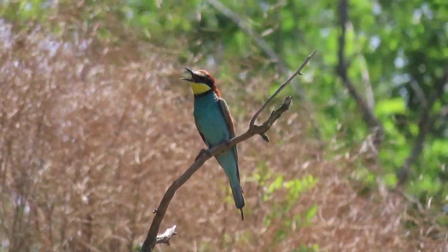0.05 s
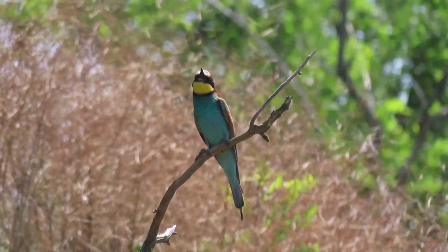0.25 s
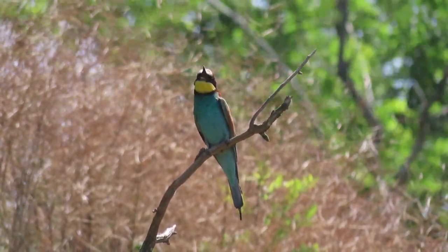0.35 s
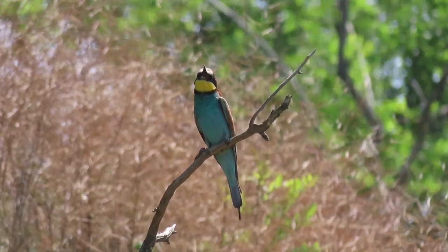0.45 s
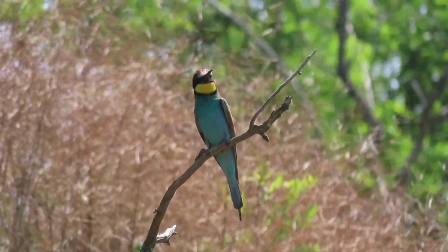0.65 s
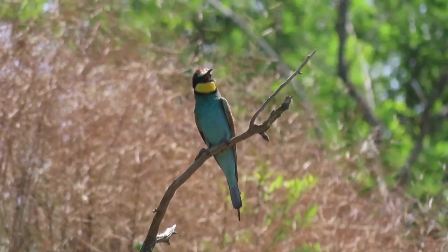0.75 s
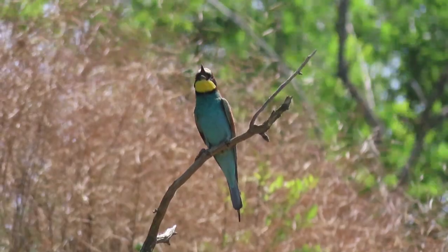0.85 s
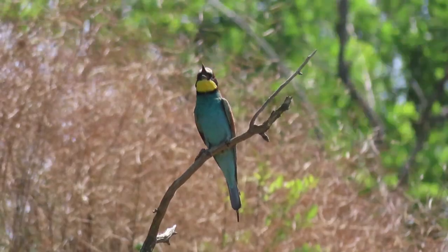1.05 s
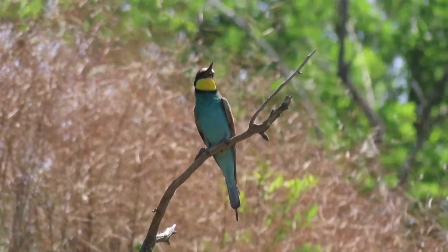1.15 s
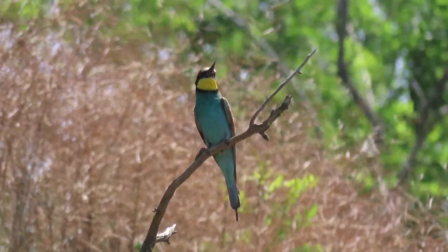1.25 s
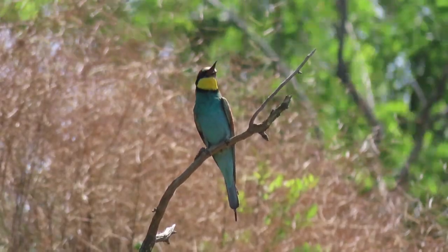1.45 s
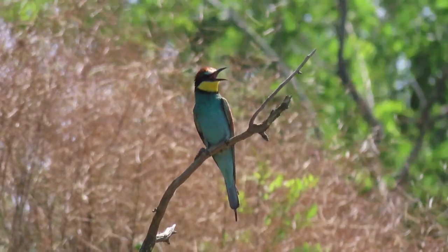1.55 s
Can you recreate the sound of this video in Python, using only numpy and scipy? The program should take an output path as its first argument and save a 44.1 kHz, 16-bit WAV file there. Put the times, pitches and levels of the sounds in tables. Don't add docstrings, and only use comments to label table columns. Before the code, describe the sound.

Bird calls, brief fluty chirps flicking up in pitch, outdoors with wind thumping the microphone

```python
import sys
import numpy as np
from scipy import signal
from scipy.fft import rfft, irfft
from scipy.io import wavfile
from scipy.ndimage import uniform_filter1d, map_coordinates

SR = 44100
rng = np.random.default_rng(int(sys.argv[2]) if len(sys.argv) > 2 else 0)


def makeup_ratio(level_db):
    decades = np.asarray(level_db, float) / 20
    return 10 ** decades


def master_out(mix):
    frames = np.transpose(np.atleast_2d(mix))
    ceiling = np.clip(frames, -1, 1)
    pcm = np.round(ceiling * 32767).astype(np.int16)
    wavfile.write(sys.argv[1], SR, pcm)


N = 70560

# (time [s], level [dB])
GUSTS = [(0.0, -39), (0.276, -36.5), (0.32, -25), (0.37, -23), (0.42, -26.5), (0.552, -22.5), (0.588, -34),
         (0.654, -27.5), (0.69, -40), (0.872, -35.5), (0.958, -25), (0.998, -27), (1.032, -29),
         (1.068, -32), (1.115, -25), (1.184, -17.5), (1.296, -30), (1.6, -41)]
# (frequency [Hz], level [dB per Hz])
RUMBLE = [(12, -32), (20, -15), (43, 6), (60, -3), (118, -4.5), (168, -11.5), (325, -32), (443, -31),
          (500, -38), (650, -76), (1100, -120)]
# (frequency [Hz], level [dB per Hz])
RUMBLE_SIDE = [(12, -33), (20, -64), (119, -4), (251, -10), (318, -6), (560, -29.5), (700, -33), (910, -44),
               (1540, -120)]
# (frequency [Hz], level [dB per Hz])
SWIRL = [(60, -65), (115, -5), (160, 1), (210, -5), (320, -20), (600, -61), (1200, -120)]
# (time [s], peak level [dB], frequency [Hz])
EDDIES = [(0.314, -24.5, 41), (0.332, -31, 80), (.345, -20, 59.3), (0.362, -19.5, 78), (0.372, -22, 88),
          (0.38, -17, 67.6), (.398, -14, 53.4), (0.419, -29, 60.6), (0.434, -23.5, 45), (0.456, -28.5, 45),
          (.481, -28.5, 39.8), (0.503, -27.5, 49.4), (0.538, -22, 36), (0.557, -22, 58), (0.602, -30.5, 30),
          (.632, -32.5, 84), (0.646, -28, 55), (0.661, -34, 70), (0.926, -39, 49.5), (.952, -22, 63),
          (0.98, -30, 79), (1.03, -24, 56.3), (1.051, -34, 75.6), (1.097, -37, 50.7), (1.117, -24.5, 95),
          (1.133, -36, 65), (1.142, -33, 75), (1.163, -18, 48.7), (1.184, -14.5, 56), (1.199, -15, 73),
          (1.217, -22, 55), (1.233, -21, 55.6), (1.254, -25, 51.6), (1.269, -40, 70), (1.307, -29.5, 59.7)]
# (time [s], level [dB])
TRAFFIC = [
    (0.0, -39.5),
    (0.676, -35.5),
    (0.894, -40.5),
    (1.332, -39),
    (1.6, -42.5),
]
# (frequency [Hz], level [dB per Hz])
ROAD = [(88, -68), (150, -0.5), (244, -6.5), (307, -4.5), (397, -7), (500, -6.5), (889, -3), (1480, -13),
        (3200, -28), (4160, -49), (7040, -120)]
# (frequency [Hz], level [dB per Hz])
ROAD_SIDE = [(88, -76), (150, -46), (285, -18), (323, -7), (613, -18), (803, -10), (3200, -26), (4160, -67),
             (7040, -120)]
# (frequency [Hz], width [Hz], level [dB])
TYRE_TONES = [(530, 42, 5.5), (699, 46, 4.5), (999, 52, 4), (1330, 81, 1.5)]
# (frequency [Hz], level [dB per Hz])
HISS = [(1470, -7.5), (2500, -1.5), (4240, -2.5), (6320, -8.5), (7770, -11.5), (8590, -14), (13200, -25),
        (15600, -25)]
# (frequency [Hz], level [dB per Hz])
HISS_SIDE = [(1470, -44), (2500, -21), (2800, -44), (3120, -28), (3720, 4), (4310, -4.5), (7480, -2),
             (15600, -18.5)]
# (time [s], pitch [Hz], level [dB])
LEFT_BIRD = [
    [(.113, 1450, -73), (.119, 1560, -39), (.13, 1802, -46), (.14, 1864, -40.5), (.157, 1903, -37),
     (.162, 2210, -50), (.172, 1867, -35), (.18, 1720, -51), (.19, 1540, -48)],
]
FIRST_CALL = [
    [(.198, 1530, -51), (.207, 1689, -45), (.233, 1828, -39), (.241, 1934, -32), (.245, 1990, -26.5),
     (.249, 2600, -36.5), (.253, 2300, -35), (.257, 1930, -31), (.262, 1800, -60)],
    [(.263, 1796, -48), (.271, 1880, -36.5), (.278, 1994, -35), (.284, 2370, -29.5), (.294, 2016, -31.5),
     (.298, 2284, -31), (.304, 1895, -42), (.312, 1680, -41), (.317, 1760, -45), (.323, 1690, -40),
     (.331, 1760, -45)],
]
SECOND_CALL = [
    [(.542, 1720, -48), (.55, 1755, -42.5), (.575, 1796, -36), (.585, 1937, -35.5), (.591, 2470, -35),
     (.594, 2450, -34.5), (.599, 1904, -34.5), (.604, 1850, -35)],
    [(.604, 1830, -37.5), (.618, 1843, -35), (.624, 1975, -33), (.629, 2344, -40.5), (.633, 2186, -37),
     (.638, 1880, -36), (.643, 2060, -33), (.647, 1910, -42), (.654, 1800, -38), (.662, 1650, -48)],
]
THIRD_CALL = [
    [(.853, 1803, -45), (.863, 1866, -43), (.869, 1970, -40.5), (.89, 2025, -41), (.897, 2270, -36),
     (.9, 2280, -34.5), (.905, 1970, -34), (.912, 1860, -50), (.92, 1810, -65)],
]
# (time [s], pitch [Hz], level [dB])
FAR_CALLS = [
    [(.364, 1812, -57), (.369, 1922, -44), (.38, 2273, -49), (.386, 1970, -65), (.396, 2055, -42),
     (.404, 2086, -62), (.418, 1984, -49), (.427, 1950, -52), (.436, 2184, -61), (.45, 1630, -47)],
    [(.445, 1330, -62), (.46, 1369, -50), (.49, 1338, -50), (.52, 1330, -48), (.545, 1330, -64)],
    [(.672, 1620, -56), (.68, 1733, -48), (.688, 2000, -48), (.697, 2100, -45)],
    [(1.086, 1756, -63), (1.097, 1946, -53), (1.104, 1970, -71), (1.117, 2020, -42), (1.123, 2320, -66),
     (1.129, 2140, -38.5), (1.134, 2040, -56.5), (1.139, 1940, -41), (1.146, 1810, -64)],
    [(1.156, 1944, -62), (1.163, 2015, -52), (1.169, 2130, -58), (1.176, 2250, -46), (1.183, 2100, -60)],
]
PAN_DB = [8, -2, -1, -2, -2]
# (time [s], peak level [dB], length [s], pitch [Hz])
WHISTLES = [
    (.243, -39, 0.042, 3060),
    (0.388, -41.5, 0.041, 3020),
    (0.539, -43.5, 0.045, 3030),
    (0.701, -44, 0.054, 2903),
    (0.878, -40.5, 0.043, 2900),
]


def unit(x):
    return x / np.sqrt(np.mean(x ** 2) + 1e-20)


def wobble(rate):
    knots = rng.standard_normal(int(N * rate / SR) + 4)
    return map_coordinates(knots, [np.arange(N) * rate / SR])


def rush(spectrum, patchy_db, bumps=()):
    z = signal.stft(rng.standard_normal(N + 2048), nperseg=512)[2]
    patches = uniform_filter1d(rng.standard_normal(z.shape), size=5, axis=0)
    patches = uniform_filter1d(patches, size=10, axis=1)
    x = signal.istft(z * makeup_ratio(patchy_db * unit(patches)), nperseg=512)[1]
    hz = np.fft.rfftfreq(len(x), 1 / SR)
    f, level = np.transpose(spectrum)
    colour_db = np.interp(np.log(hz + 1), np.log(f + 1), level)
    for centre, width, hump_db in bumps:
        colour_db = colour_db + hump_db * np.exp(-((hz - centre) / width) ** 2)
    return unit(irfft(rfft(x) * makeup_ratio(colour_db), len(x))[:N])


def stereo(mid, side, pan_db):
    return np.array([mid + side, mid - side]) * makeup_ratio([[pan_db / 2], [-pan_db / 2]])


def eddy_thumps():
    cycles, suction = 0.43, 0.47
    out = 0
    for at, db, hz in EDDIES:
        t = np.arange(N) / SR - at
        turn = 2 * np.pi * hz * t
        push = np.cos(turn) + suction * np.sin(turn) + 0.14 * np.cos(2.75 * turn)
        out = out + makeup_ratio(db) * np.exp(-(t * hz / cycles) ** 2) * push
    return out


def wind():
    under_db, flow_top_db = -4.5, -35.5
    swirl_db, side_db, louder_left_db = -17, -20.5, 1.2
    even_s = 0.0283
    s, db = np.transpose(GUSTS)
    gust_db = np.interp(np.arange(N) / SR, s, db) + 2 * wobble(30.95)
    flow = rush(RUMBLE, patchy_db=-4.0)
    flow_power = np.abs(uniform_filter1d(flow ** 2, int(even_s * SR)) + 0.017)
    flow = unit(flow / np.sqrt(flow_power))
    rumble = makeup_ratio(np.minimum(gust_db + under_db, flow_top_db)) * flow
    swirls = makeup_ratio(gust_db + swirl_db) * rush(SWIRL, patchy_db=0.5)
    side = makeup_ratio(gust_db + side_db) * rush(RUMBLE_SIDE, patchy_db=5.5)
    return stereo(rumble + eddy_thumps() + swirls, side, louder_left_db)


def road():
    road_db, side_db, louder_right_db = -39.5, -50, 1.4
    roar_follows, treble_follows = 0.24, 0.96
    s, db = np.transpose(TRAFFIC)
    near_db = np.interp(np.arange(N) / SR, s, db - db.mean())
    roar = rush(ROAD, patchy_db=1.0, bumps=TYRE_TONES)
    dull = uniform_filter1d(roar, size=15)
    roar = dull + (roar - dull) * makeup_ratio(treble_follows * near_db)
    swell = makeup_ratio(roar_follows * near_db + 0.42 * wobble(9.26))
    side = makeup_ratio(side_db) * rush(ROAD_SIDE, patchy_db=3.5)
    return swell * stereo(makeup_ratio(road_db) * roar, side, -louder_right_db)


def hiss():
    mid = makeup_ratio(-56.5) * rush(HISS, patchy_db=1.3)
    side = makeup_ratio(-61.5) * rush(HISS_SIDE, patchy_db=-1.5)
    return stereo(mid, side, 0)


def cricket():
    tick_hz, rate_hz, first_s, tick_s = 7740, 50, 0.013, 0.0031
    tick_db, scatter_db, accent_db = -65.5, -1.5, 4.5
    k = np.arange(int(N / SR * rate_hz))
    luck = rng.standard_normal((len(k), 3))
    t = np.arange(-300, 300) / SR
    size = makeup_ratio(tick_db + scatter_db * luck[:, :1] + accent_db * (k[:, None] % 5 == 3))
    ring = np.sin(2 * np.pi * (tick_hz + 60 * luck[:, 1:2]) * t + 3 * luck[:, 2:])
    stroke = size * np.exp(-(t / tick_s) ** 2) * ring
    starts = np.round((first_s + k / rate_hz) * SR).astype(int)
    at = starts[:, None] + np.arange(len(t))
    return np.bincount(at.ravel(), stroke.ravel(), N + SR)[len(t) // 2:][:N]


def syllable(rows, rough_db):
    s, hz, db = np.transpose(rows)
    t = np.arange(N) / SR
    pitch_hz = uniform_filter1d(np.interp(t, s, hz), size=70)
    level_db = uniform_filter1d(np.interp(t, s, db), size=70) + rough_db * wobble(150)
    phase = 2 * np.pi * np.cumsum(pitch_hz) / SR
    inside = uniform_filter1d(((t >= s[0]) & (t < s[-1])) * 1., size=40)
    return inside * makeup_ratio(level_db) * (np.sin(phase) + makeup_ratio(-34) * np.sin(2 * phase))


def bushes(dry, echo_db, t60):
    t = np.arange(SR // 3) / SR
    tail = rng.standard_normal((2, len(t))) * makeup_ratio(-60 * t / t60) * (t > .003)
    tail = tail / np.linalg.norm(tail[0])
    return dry + makeup_ratio(echo_db) * signal.fftconvolve(dry, tail, axes=1)[:, :N]


def near_bee_eaters():
    calls = 0
    for table, pan_db in zip([LEFT_BIRD, FIRST_CALL, SECOND_CALL, THIRD_CALL], PAN_DB):
        calls = calls + stereo(sum(syllable(rows, 1.1) for rows in table), 0, pan_db)
    return bushes(calls, echo_db=-9, t60=.2)


def higher_bird():
    scoop_hz, scoop_s, edge_s, weakens_db_per_s = 590, 0.0074, 0.004, 198
    burr_hz, burr, waver_rad = 66, .55, .9
    lead_s = np.array([[.00008], [0]])
    out = 0
    for s, db, length, hz in WHISTLES:
        u = np.clip(np.arange(N) / SR - s + lead_s, 0, None)
        scoop = scoop_hz * scoop_s * np.exp(-u / scoop_s)
        phase = 2 * np.pi * (hz * u + scoop) + waver_rad * wobble(220)
        edges = np.clip(np.minimum(u, (length - u) / 2) / edge_s, 0, 1)
        throb = (1 + burr * np.cos(2 * np.pi * burr_hz * (u - 2.27 * edge_s))) / (1 + burr)
        level_db = db - weakens_db_per_s * u + 1.7 * wobble(160)
        out = out + makeup_ratio(level_db) * edges * throb * np.sin(phase)
    return out


def distant_birds():
    flock = stereo(sum(syllable(rows, 4.5) for rows in FAR_CALLS), 0, PAN_DB[-1])
    return bushes(flock + higher_bird(), echo_db=-4, t60=.25)


def scene():
    return wind() + road() + hiss() + cricket() + near_bee_eaters() + distant_birds()


def low_pass(x):
    return signal.sosfilt(signal.butter(12, 15770, fs=SR, output="sos"), x)


def record(dry):
    n = np.arange(N)
    ends = np.clip(np.minimum(n, n[::-1]) / 60, 0, 1)
    return low_pass(dry * ends)


dry = scene()
out = record(dry)
master_out(out)
```